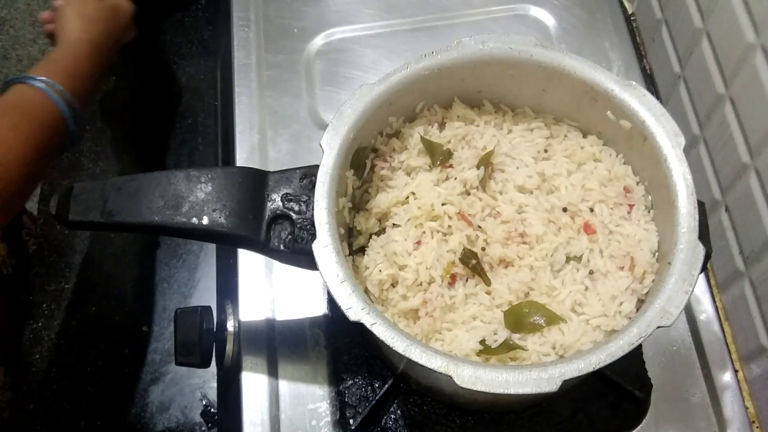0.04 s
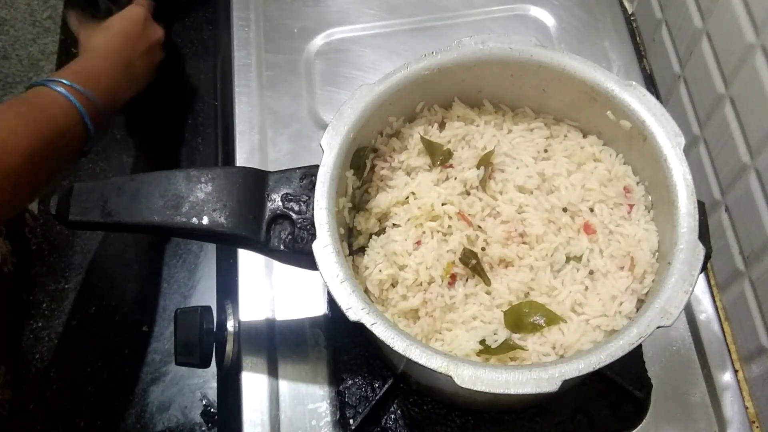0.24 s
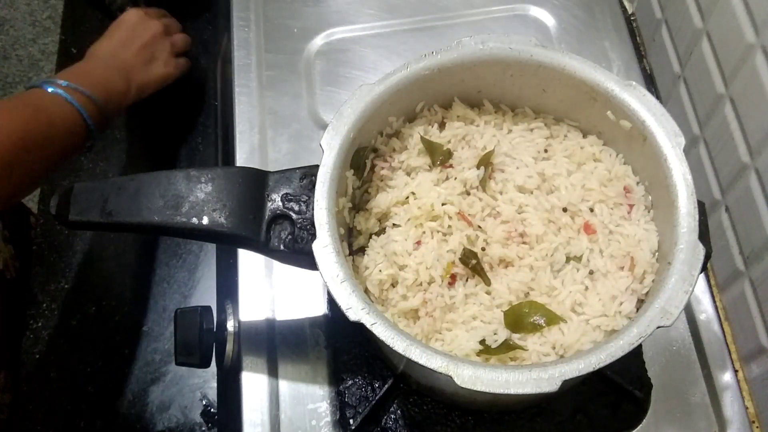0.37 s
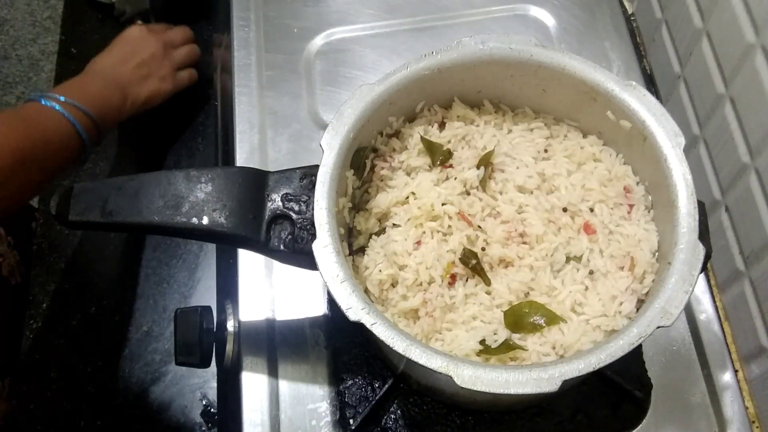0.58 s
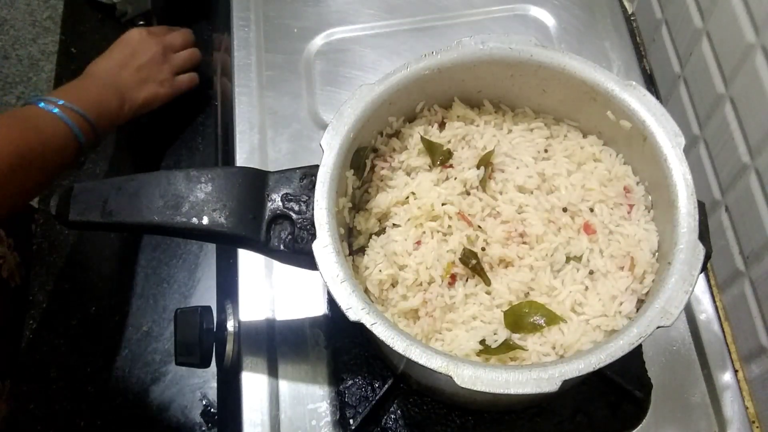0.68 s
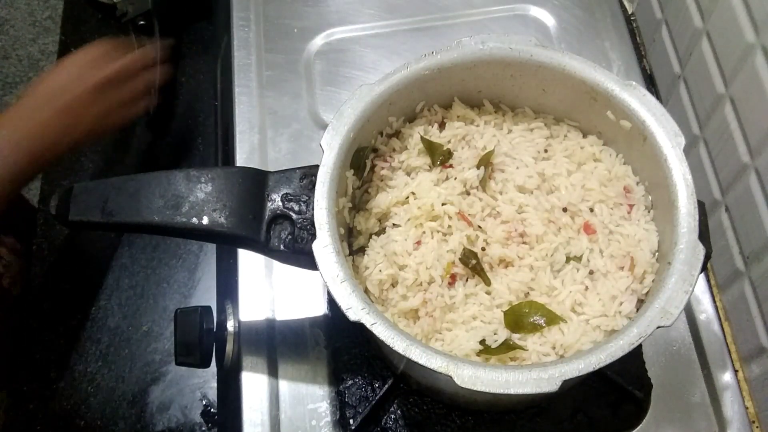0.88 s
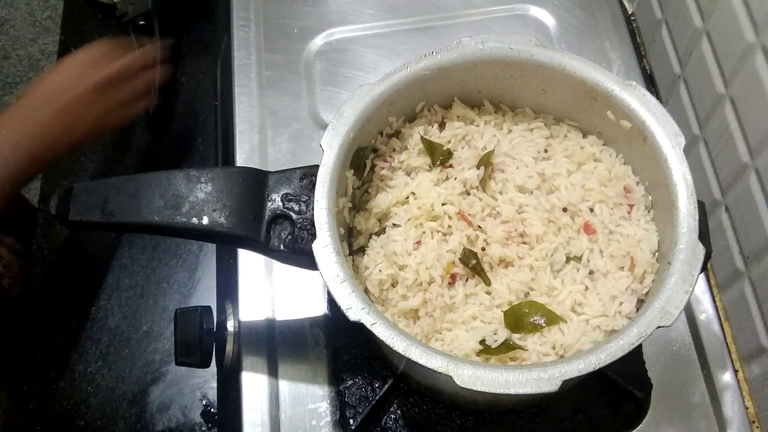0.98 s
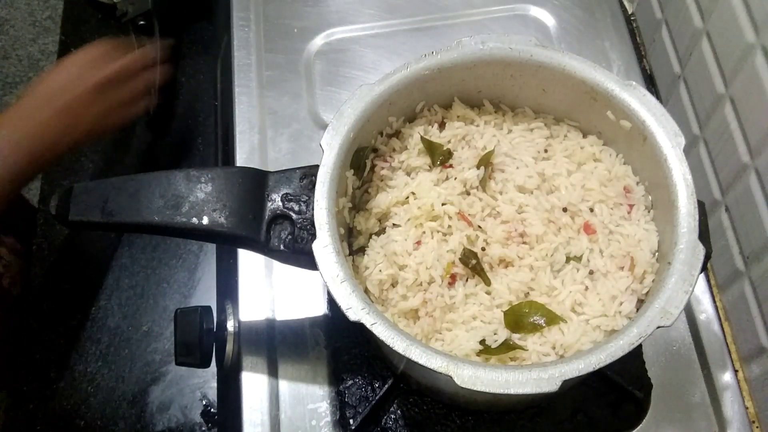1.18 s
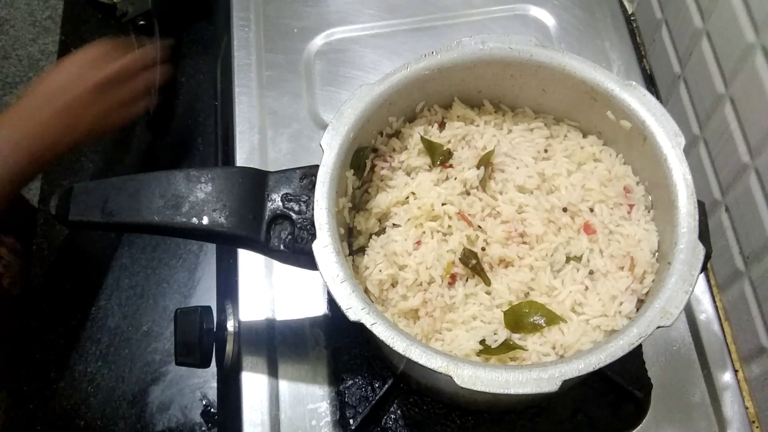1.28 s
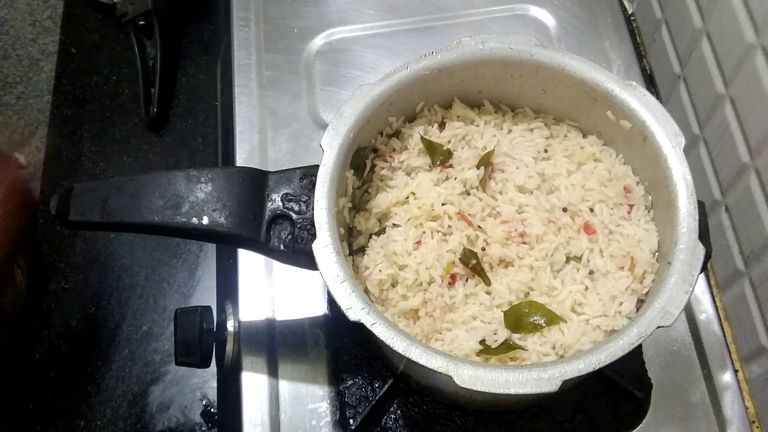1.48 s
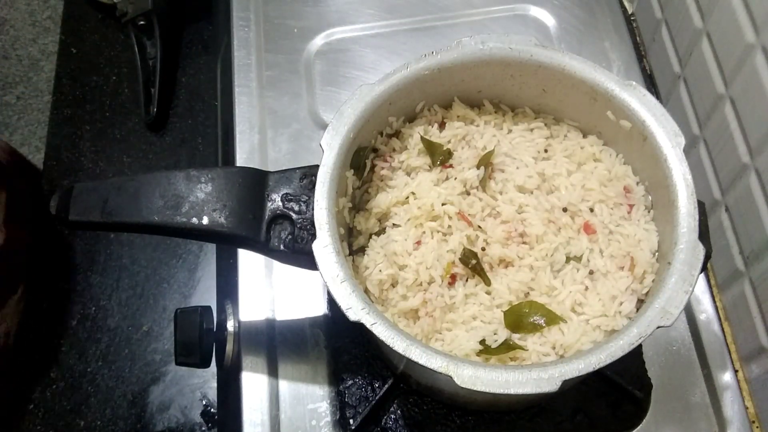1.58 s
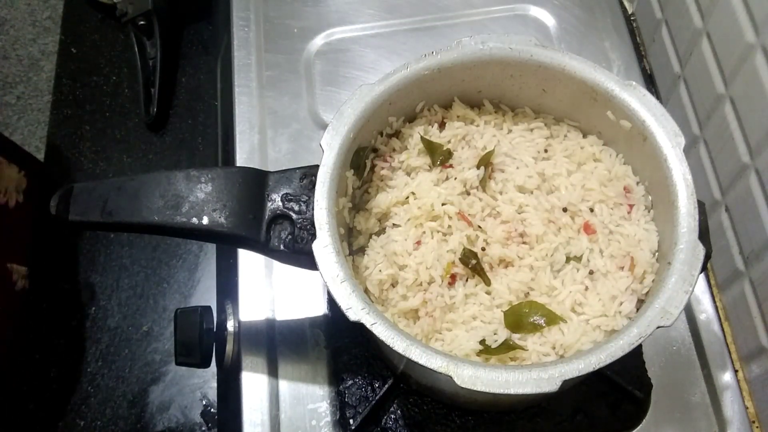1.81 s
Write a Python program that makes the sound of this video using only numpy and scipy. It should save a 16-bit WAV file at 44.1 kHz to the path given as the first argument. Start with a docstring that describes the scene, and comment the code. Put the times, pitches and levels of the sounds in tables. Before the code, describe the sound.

In a small, quiet kitchen, a metal lid is set down slightly to the left: a scuffing bump, then one loud clank as the steel stove top booms. Afterwards come a light handle tap, faint bangle jingles and a soft rustle.

```python
"""A small, quiet kitchen: a metal cooker lid is set down on a steel stove top, left of centre.
The rim bumps and scuffs, then drops with a loud clank that leaves the lid ringing.
The sheet steel booms under each landing and flexes as the lid rocks. The metal ticks,
the handle taps once, fingers slide off and clothes rustle. Wrist bangles jingle faintly,
and a low room rumble runs throughout."""
import sys
import numpy as np
from scipy import signal
from scipy.fft import rfft, irfft, next_fast_len
from scipy.io import wavfile

SR = 44100
rng = np.random.default_rng(int(sys.argv[2]) if len(sys.argv) > 2 else 0)


def pcm_store(signal):
    """Save signal as 16-bit PCM."""
    levels = np.round(np.clip(np.atleast_2d(signal), -1, 1) * 32767)
    wavfile.write(sys.argv[1], SR, levels.astype(np.int16).T)


N = 81585
SIZE = next_fast_len(2 * N)
FREQS = np.maximum(np.arange(SIZE // 2 + 1) * SR / SIZE, 1)
TIME = np.arange(N) / SR


def from_db(db):
    """Decibels to gain."""
    return 10 ** (np.asarray(db) / 20)


def at_hz(points):
    """Table interpolated over FREQS on a log axis."""
    hz, value = np.transpose(points)
    return np.interp(np.log(FREQS), np.log(hz), value)


def colour(x, spectrum):
    """Minimum-phase filter; white noise keeps its level."""
    gain = from_db(at_hz(spectrum))
    cepstrum = irfft(np.log(gain / np.sqrt(np.mean(gain ** 2))), SIZE)
    cepstrum[1:SIZE // 2] *= 2
    cepstrum[SIZE // 2 + 1:] = 0
    return irfft(rfft(x, SIZE) * np.exp(rfft(cepstrum)), SIZE)[..., :N]


def cut(x, hz, kind, order=2):
    """Low-pass or high-pass."""
    sos = signal.butter(order, min(hz, .45 * SR), kind, fs=SR, output="sos")
    return signal.sosfilt(sos, x + 1e-18)


def pan(x, left_db):
    """Left up, right down, each by left_db."""
    return x * from_db([[left_db], [-left_db]])


def decay(t60_s):
    """Exponential envelope."""
    return from_db(-60 * TIME / t60_s)


def swell(centre_s, half_s, db):
    """Smooth rise and fall."""
    return from_db(db) / np.cosh(np.clip((TIME - centre_s) / half_s, -30, 30))


def through(x, response):
    """Convolution with a stereo response."""
    return signal.fftconvolve(np.atleast_2d(x), response, axes=1)[:, :N]


def clicks(contacts):
    """One impulse per contact; softer is duller."""
    out = np.zeros(N)
    for time_s, db, hardness_hz in contacts:
        impulse = from_db(db) * (np.arange(N) == int(time_s * SR))
        out += cut(impulse, hardness_hz, "low")
    return out


def modes(pitches_hz, rings, skew_rad):
    """Struck modes; higher ones reach the two sides out of phase."""
    out = np.zeros((2, N))
    for k, (hz, (db, t60_s)) in enumerate(zip(pitches_hz, rings)):
        sign = (-1) ** k
        phase = sign * skew_rad * min(hz / 1000, 1) * np.array([[1], [-1]])
        out += sign * from_db(db) * decay(t60_s) * np.sin(2 * np.pi * hz * TIME + phase)
    return out


# room sound field: (frequency [Hz], left-right correlation [ratio])
CORRELATION = [(100, 1), (300, .92), (700, .5), (1400, 0.017), (15000, .02)]

def diffuse():
    """Stereo white noise, alike in the bass, unrelated in the treble."""
    alike = np.clip(at_hz(CORRELATION), -1, 1)
    mid, side = rfft(rng.standard_normal((2, N)), SIZE)
    mid *= np.sqrt((1 + alike) / 2)
    side *= np.sqrt((1 - alike) / 2)
    return irfft([mid + side, mid - side], SIZE)[:, :N]


def strike(contacts, spectrum, highpass_hz, crack_db, early_db, early_t60_s,
           tail_t60_s, tail_hz, late_db, late_t60_s, late_hz):
    """Metal contacts: crack, dense early ring, kitchen tail with a duller late part."""
    tail = cut(diffuse(), tail_hz, "low", order=4) * decay(tail_t60_s)
    early = pan(from_db(early_db) * diffuse() * decay(early_t60_s), left_db=5.5)
    late = from_db(late_db) * cut(diffuse(), late_hz, "low", order=1) * decay(late_t60_s)
    response = early + tail + late
    response[0, 0] += from_db(crack_db)  # left only
    hits = through(clicks(contacts), response)
    return cut(colour(hits, spectrum), highpass_hz, "high")


# room rumble: (frequency [Hz], level [dB])
RUMBLE_SPECTRUM = [(20, -37), (40, -3.5), (57, 3), (78, -9), (108, 3), (150, -8.5), (205, -12), (240, -17),
                   (380, -15.5), (500, -21), (700, -26.5), (1450, -26.5), (2400, -33.5), (2900, -47.5),
                   (3350, -46), (3900, -68.5), (4400, -53.5), (5200, -67), (8000, -59.5), (9900, -54),
                   (11500, -62.5), (15000, -72)]

def room_rumble():
    """Steady low noise of the kitchen."""
    return from_db(-54.5) * colour(diffuse(), RUMBLE_SPECTRUM)


# bangle contacts: (time [s], level [dB], hardness [Hz])
BANGLE_HITS = [(0.002, -65, 7700), (1.527, -69.5, 17000), (1.566, -70, 14000), (1.68, -76.5, 12000)]
# bangle ring: (frequency [Hz], level [dB])
BANGLE_SPECTRUM = [(2500, -6), (3350, 3.5), (3900, -25), (4800, -2.5), (5400, -10), (6000, -3), (7500, -23),
                   (9800, 3.5), (11500, -17), (15000, -32)]

def bangles():
    """Thin rings knock together and shimmer as the wrist moves."""
    shimmer = diffuse() * decay(t60_s=.2)
    return colour(through(clicks(BANGLE_HITS), shimmer), BANGLE_SPECTRUM)


# weight landing on the stove top: (time [s], level [dB], hardness [Hz])
THUDS = [(0.2286, -28.5, 694), (0.266, -44.5, 387), (0.2755, -24.5, 370), (0.338, -25.5, 250),
         (0.4332, -20, 1000), (1.1468, -37.5, 407)]
# dense ring of the sheet: (frequency [Hz], level [dB])
BOOM_SPECTRUM = [(60, -48), (115, -10.5), (150, 10.5), (205, -7.5), (260, 4), (330, -11.5), (470, -14),
                 (540, -7), (640, -4), (800, -16.5), (1400, -28)]
# sheet modes: (frequency [Hz])
SHEET_HZ = [151, 188, 260, 412, 476, 608, 641]
# ring of each sheet mode: (level [dB], T60 [s])
SHEET_RINGS = [(1, 0.19), (-8, .1), (-0.5, 0.23), (-19, 0.4), (-5, 0.24), (1, .14), (-2, 0.23)]

def stove_boom():
    """Each landing pushes the sheet steel: one brief swing, then a boom."""
    boom = from_db(-3) * colour(diffuse(), BOOM_SPECTRUM) * decay(t60_s=.42)
    swing = modes([631], [(16.5, .011)], skew_rad=-1.8)
    ring = modes(SHEET_HZ, SHEET_RINGS, skew_rad=.6)
    thuds = cut(through(clicks(THUDS), ring + boom + swing), 950, "low", order=4)
    return pan(cut(thuds, 120, "high"), left_db=2)  # the sheet radiates little deep bass


# rim scuffs: (time [s], level [dB], hardness [Hz])
SCUFFS = [(0.2357, -39.5, 5000), (0.2485, -33.5, 14000), (0.256, -43.5, 6990), (0.271, -35.5, 13000),
          (0.276, -37.5, 8910), (0.2867, -32, 11000), (0.325, -42.5, 12000), (0.345, -42, 2950)]
# rim rubbing on steel: (frequency [Hz], level [dB])
SCUFF_SPECTRUM = [(470, -46), (800, -12), (851, -16), (1100, -12.5), (1360, -3), (1800, -2.5), (2060, -18),
                  (2690, 0), (2860, -14), (4090, -23), (4400, -32), (4680, -19.5), (5290, -31.5),
                  (5980, -9), (7550, -20.5), (10500, -10.5), (13100, -27), (14500, -23.5), (15000, -52.5)]

def rim_scuff():
    """The rim grazes the stove top as it lands."""
    scuff = strike(SCUFFS, SCUFF_SPECTRUM, highpass_hz=900, crack_db=17, early_db=-1, early_t60_s=.015,
                   tail_t60_s=.3, tail_hz=14000, late_db=-14.5, late_t60_s=.45, late_hz=5000)
    return pan(scuff, left_db=2.5)


def rim_grit(slips_per_s=780, spread_db=5):
    """After touchdown the rim catches and slips at random."""
    slips = rng.random(N) < slips_per_s / SR
    strength = from_db(spread_db * np.minimum(rng.exponential(1, N), 2))
    envelope = swell(centre_s=.28, half_s=.012, db=-34) * (TIME > SCUFFS[0][0])
    rasp = through(slips * strength * envelope, diffuse() * decay(t60_s=.0044))
    return pan(cut(colour(rasp, SCUFF_SPECTRUM), 1200, "high"), left_db=3.5)


# lid modes: (frequency [Hz])
LID_HZ = [859, 998, 1126, 1238, 1324, 1362, 1593, 1739, 2118, 2700, 4020, 6092, 6207, 6850, 8140, 9148,
          10260, 11560]
# strength of each lid mode: (level [dB])
LID_DB = [-4, -2.5, -4, -9.5, -0.5, -6.5, -5.5, -3, -8.5, -7, -11.5, -4.5, -9.5, -8, -13, -10.5, -11, -16]

def lid_ring(split=.004, t60_at_1khz_s=.26, damping_power=.08):
    """Scuffs and clank ring the uneven lid; each mode beats with two weaker neighbours."""
    ring = np.zeros((2, N))
    for hz, db in zip(LID_HZ, LID_DB):
        pitches_hz = hz * (1 + split * np.array([0, -1, 1]) * rng.uniform(1.0, 1.3, 3))
        phases = rng.uniform(0, 2 * np.pi, (3, 2, 1))
        partials = sum(gain * np.sin(2 * np.pi * pitch * TIME + phase)
                       for gain, pitch, phase in zip((1, .5, .5), pitches_hz, phases))
        t60_s = t60_at_1khz_s * (hz / 1000) ** -damping_power
        ring += from_db(db) * decay(t60_s) * partials
    blows = from_db(-24) * clicks(SCUFFS) + from_db(-3.5) * clicks(CLANKS[:1])
    return pan(through(blows, cut(ring, 420, "high")), left_db=3)


# rim impacts: (time [s], level [dB], hardness [Hz])
CLANKS = [(0.4412, -22.5, 16000), (0.4433, -29.5, 5000), (0.4452, -23.5, 11000), (0.4476, -22.5, 9000)]
# rim striking steel: (frequency [Hz], level [dB])
CLANK_SPECTRUM = [(410, -32), (700, -6), (807, -11.5), (839, -7.5), (980, 0.5), (1070, -2.5), (1220, -7),
                  (1370, 5), (1500, -11.5), (1780, -0.5), (1920, -6.5), (2630, -10), (3490, -18),
                  (3630, -27), (3970, -11.5), (4410, -17), (5500, -21), (6260, -12), (7500, -22.5),
                  (7900, -14.5), (8990, -11.5), (11200, -17.5), (12100, -20), (14300, -21.5),
                  (15500, -55.5)]

def rim_clank():
    """The rim drops flat in a quick run of hard contacts."""
    clank = strike(CLANKS, CLANK_SPECTRUM, highpass_hz=790, crack_db=20.5, early_db=1, early_t60_s=.019,
                   tail_t60_s=.25, tail_hz=12500, late_db=-18.5, late_t60_s=.64, late_hz=5900)
    return pan(clank, left_db=3)


# sheet flexes: (centre time [s], half length [s], level [dB])
FLEXES = [(0.615, 0.012, -37), (0.762, 0.0086, -39)]

def stove_flex(pitch_hz=162):
    """The sheet flexes softly as the lid rocks."""
    envelope = sum(swell(*row) for row in FLEXES)
    return pan(envelope * np.sin(2 * np.pi * pitch_hz * TIME), left_db=2)


# settling ticks: (time [s], level [dB], hardness [Hz])
TICKS = [(0.770, -61.5, 18100), (1.527, -64.5, 16000), (1.564, -58.5, 16400)]
# tick ring: (frequency [Hz], level [dB])
TICK_SPECTRUM = [(2000, -34), (8000, -22), (10000, 4.5), (13000, -51), (14600, 10.5), (15600, -4.5)]

def metal_ticks():
    """The metal ticks faintly as it settles."""
    ticks = strike(TICKS, TICK_SPECTRUM, highpass_hz=1510, crack_db=26, early_db=6, early_t60_s=.03,
                   tail_t60_s=.29, tail_hz=17000, late_db=-11, late_t60_s=1, late_hz=12000)
    return pan(ticks, left_db=3.5)


# handle contacts: (time [s], level [dB], hardness [Hz])
TAPS = [(1.147, -46, 514), (1.1537, -38, 10500), (1.158, -47, 4570)]
# handle knock: (frequency [Hz], level [dB])
TAP_SPECTRUM = [(71, -35), (120, 3), (229, -12.5), (263, -1), (405, -12.5), (623, -18.5), (773, -14.5),
                (869, -10), (1980, -23), (2550, -13.5), (4090, -15), (8780, -23.5), (13000, -29)]

def handle_tap():
    """Three close contacts of the handle make one light tap."""
    tap = strike(TAPS, TAP_SPECTRUM, highpass_hz=115, crack_db=1, early_db=-3, early_t60_s=.03,
                 tail_t60_s=.26, tail_hz=12000, late_db=-20, late_t60_s=1, late_hz=2530)
    return pan(tap, left_db=3)


# finger friction: (frequency [Hz], level [dB])
SLIDE_SPECTRUM = [(3000, -40), (6000, -13.5), (9800, 4.5), (12000, -1), (15000, -9), (16000, -16)]

def finger_slide():
    """Fingers slide off with a faint hiss."""
    return swell(centre_s=1.575, half_s=.046, db=-64) * colour(diffuse(), SLIDE_SPECTRUM)


# cloth friction: (frequency [Hz], level [dB])
RUSTLE_SPECTRUM = [(30, -28), (70, 8), (150, 23), (400, 8.5), (1400, 0.5), (2100, 12), (3500, -18),
                   (4600, -4.5), (7000, -28), (10000, 2.5), (14000, -30)]

def clothes_rustle():
    """Cloth rubs in one soft swell."""
    return swell(centre_s=1.81, half_s=.043, db=-63) * colour(diffuse(), RUSTLE_SPECTRUM)


def scene():
    """Lid and stove top over the quiet room, all leaning left."""
    quiet = room_rumble() + finger_slide() + clothes_rustle() + bangles()
    stove = stove_boom() + stove_flex()
    lid = rim_scuff() + rim_clank() + lid_ring() + rim_grit()
    settling = handle_tap() + metal_ticks()
    return stove + lid + settling + pan(quiet, left_db=5)


def record(dry):
    """Steep low-pass at 15.8 kHz."""
    return signal.sosfilt(signal.ellip(10, .1, 80, 15800, fs=SR, output="sos"), dry)


dry = scene()
out = record(dry)
pcm_store(out)
```